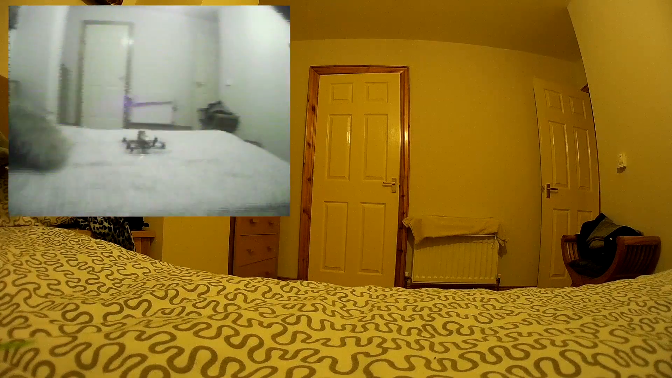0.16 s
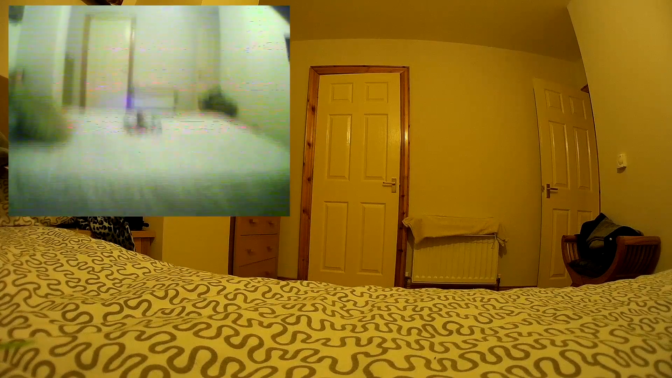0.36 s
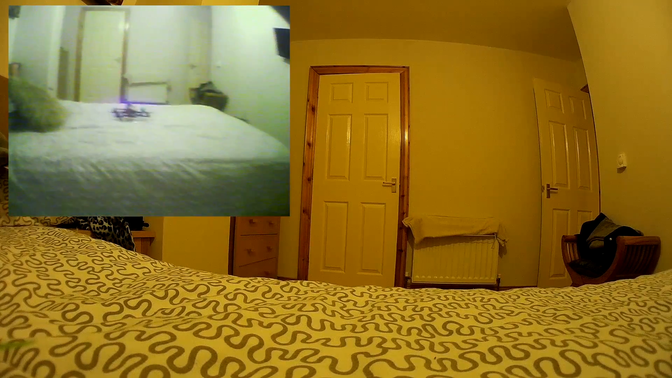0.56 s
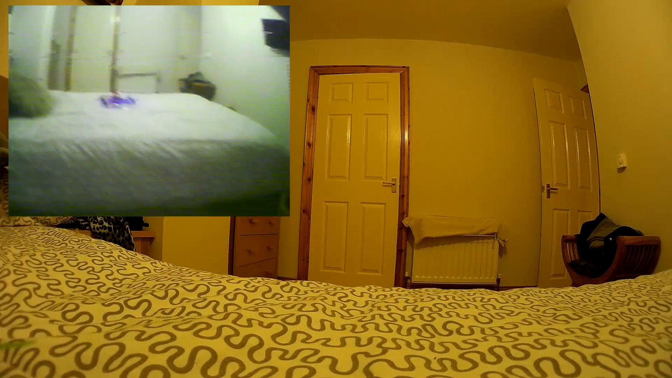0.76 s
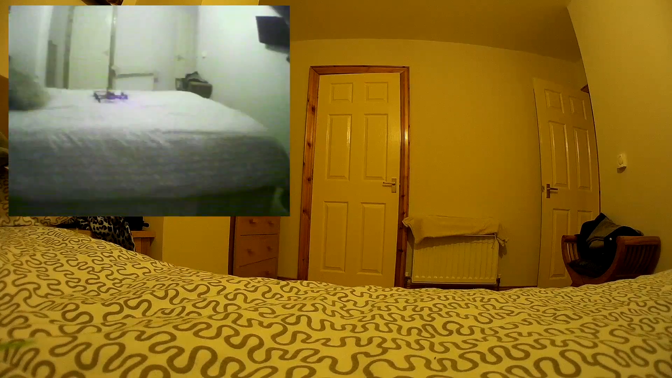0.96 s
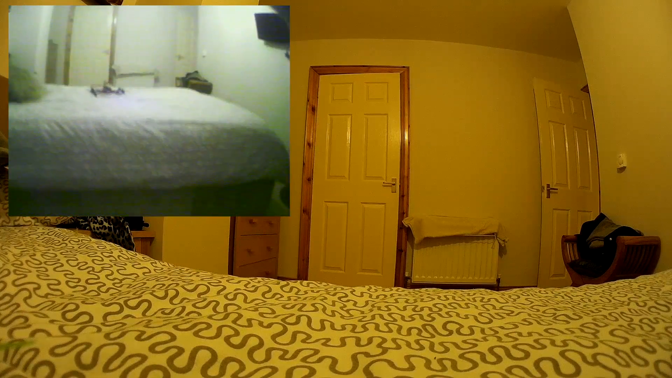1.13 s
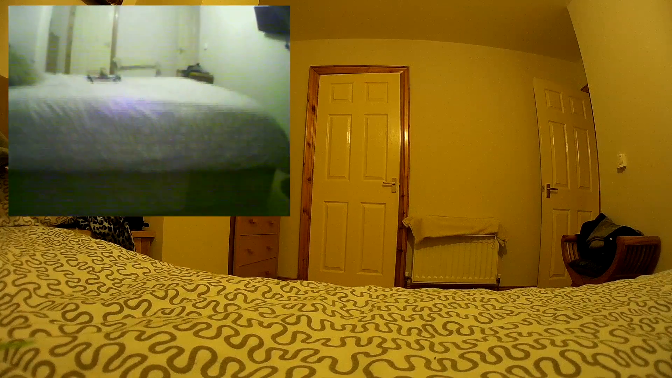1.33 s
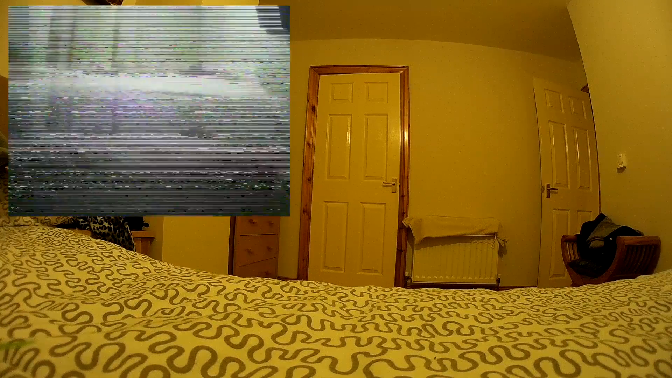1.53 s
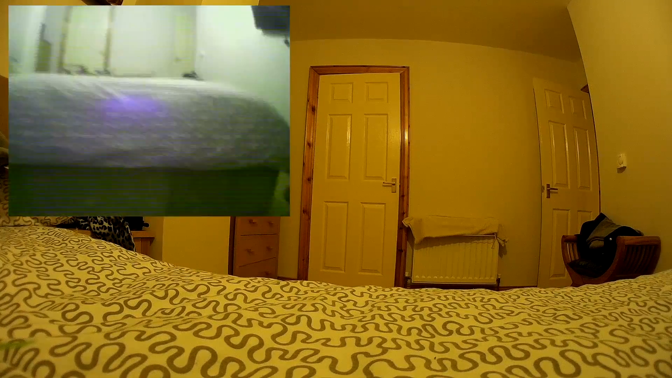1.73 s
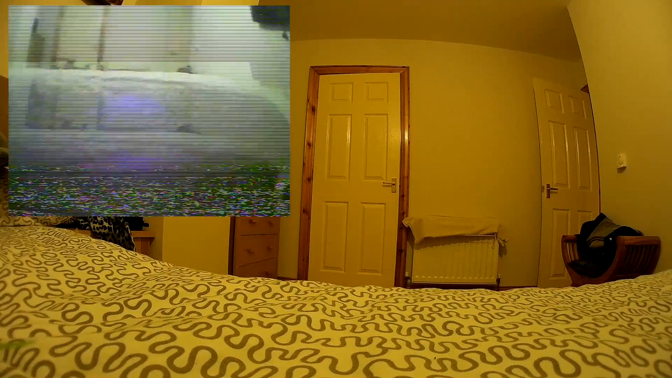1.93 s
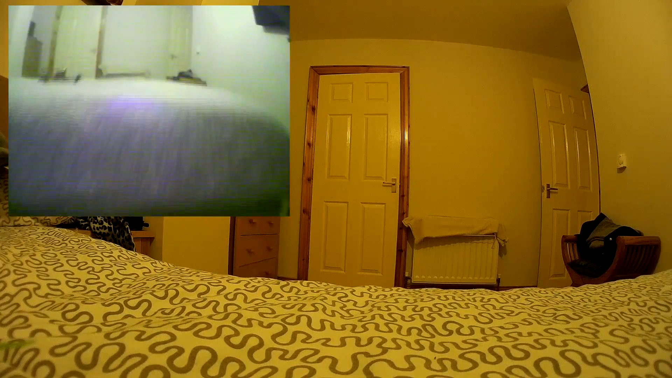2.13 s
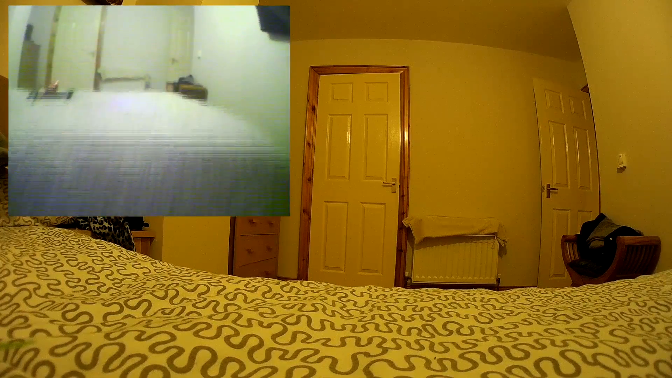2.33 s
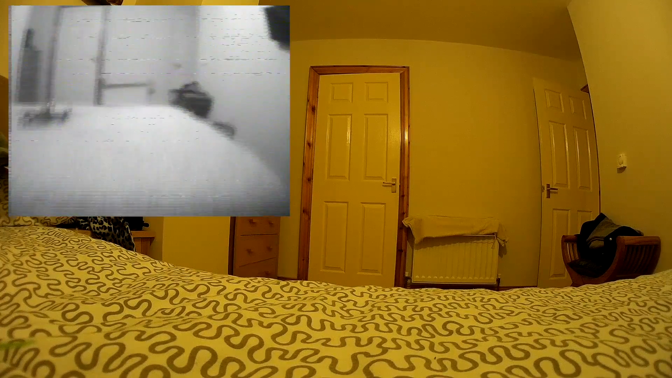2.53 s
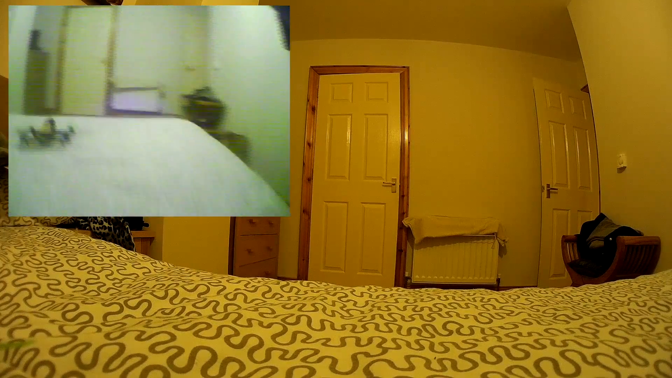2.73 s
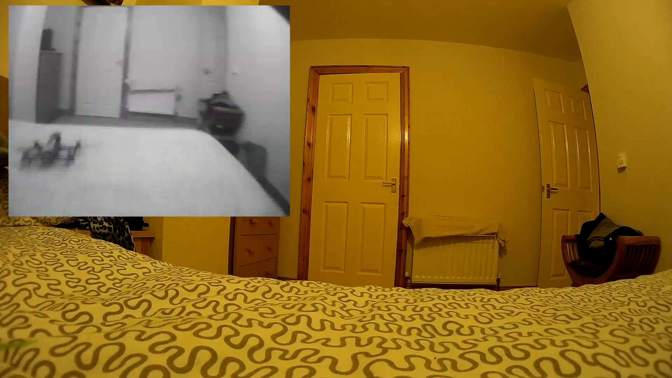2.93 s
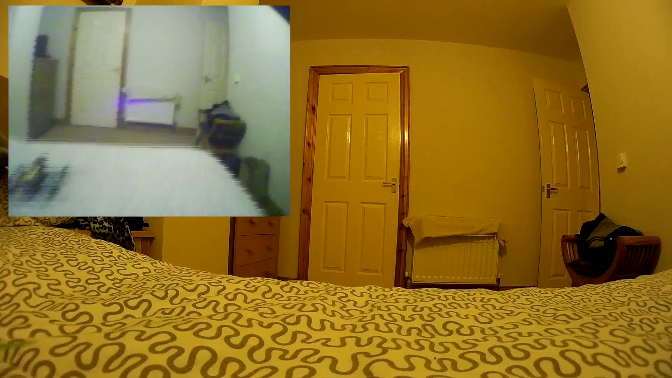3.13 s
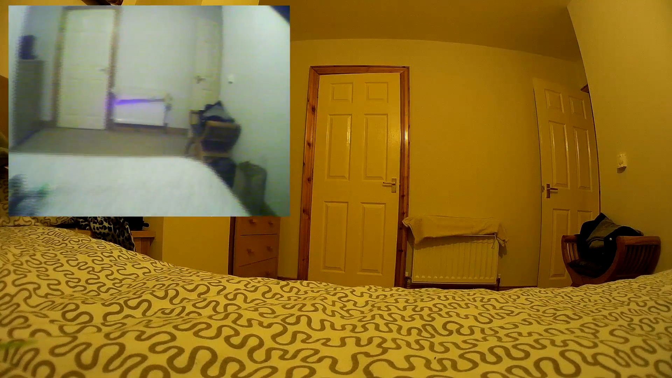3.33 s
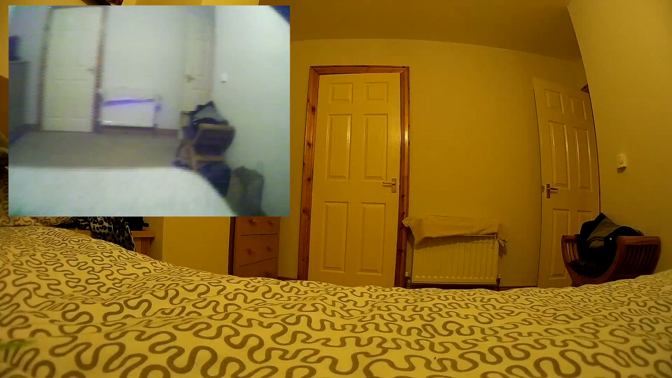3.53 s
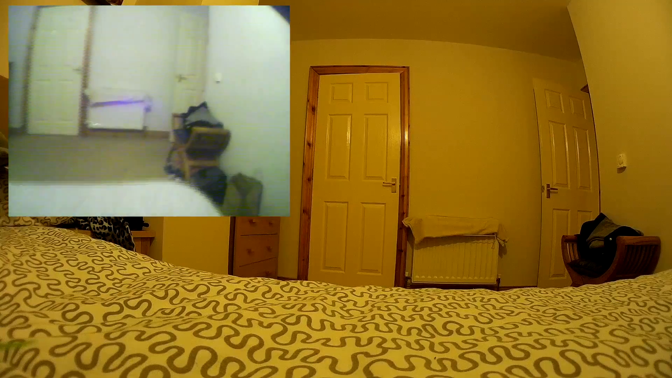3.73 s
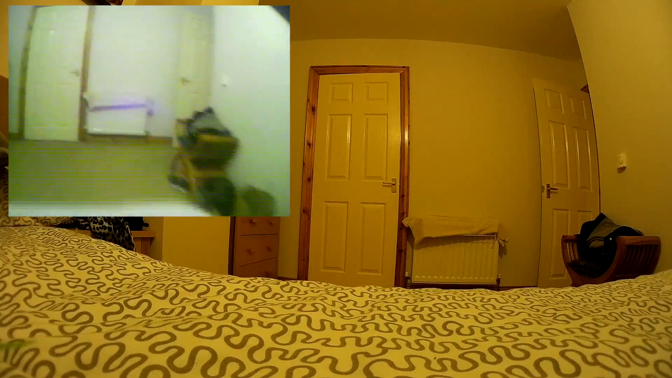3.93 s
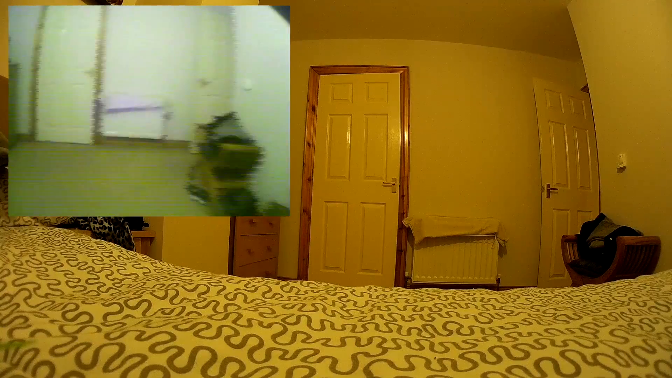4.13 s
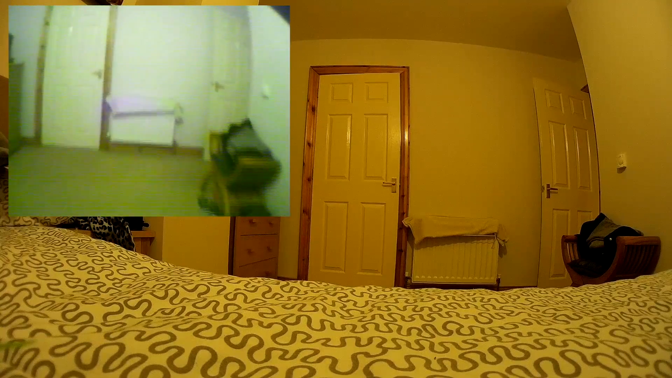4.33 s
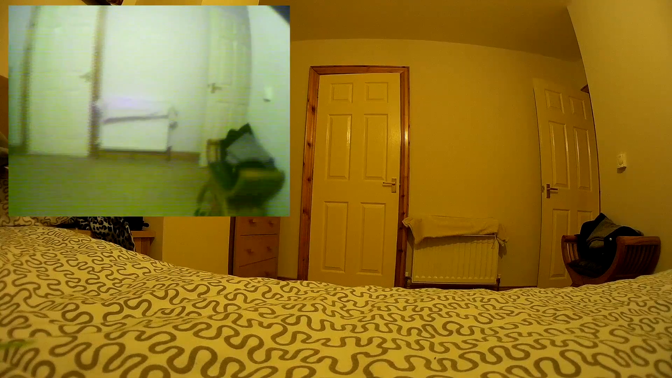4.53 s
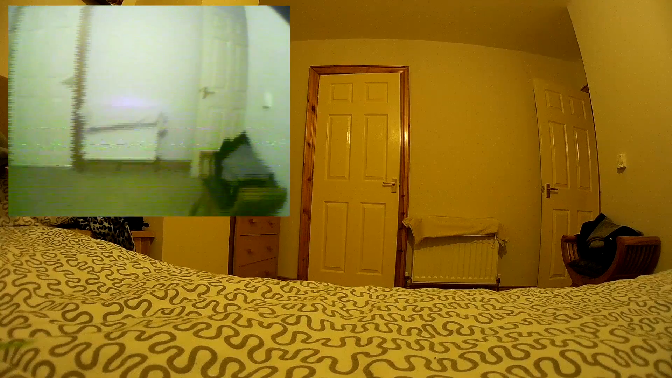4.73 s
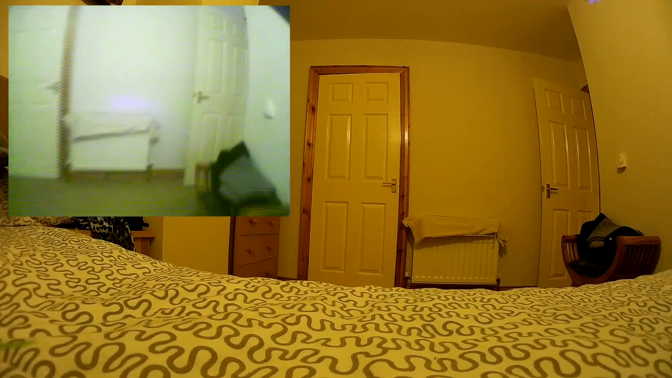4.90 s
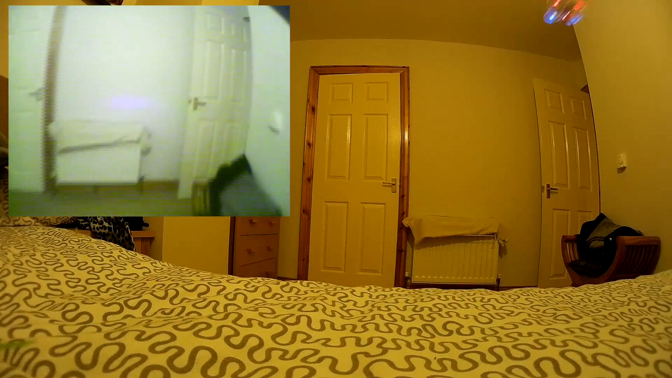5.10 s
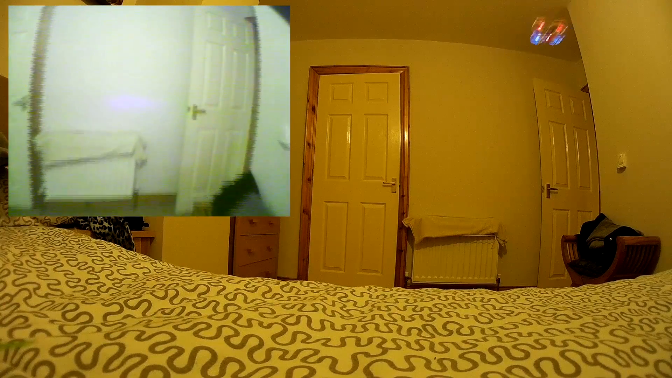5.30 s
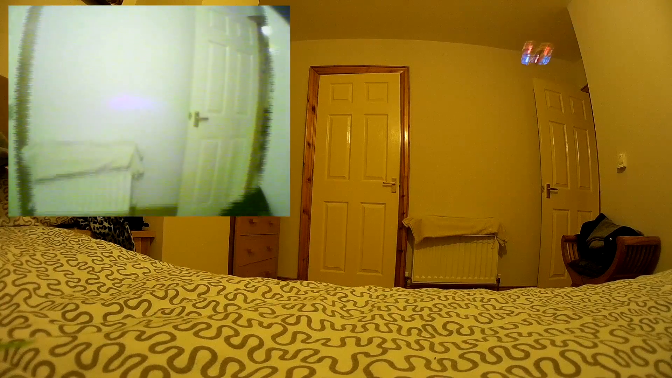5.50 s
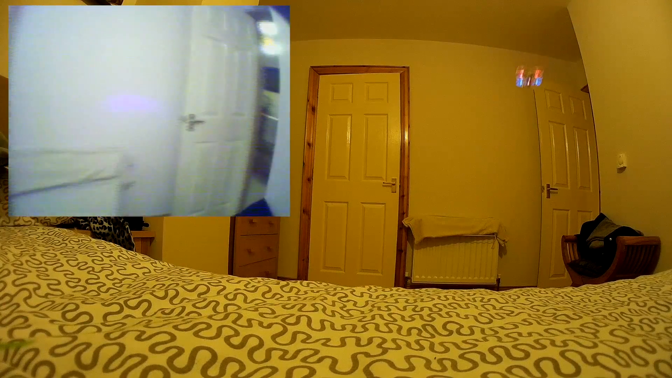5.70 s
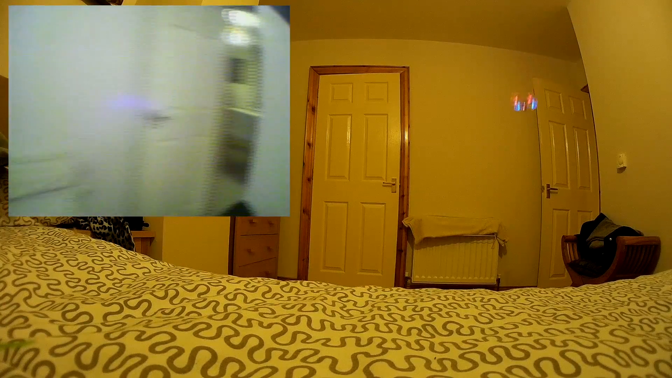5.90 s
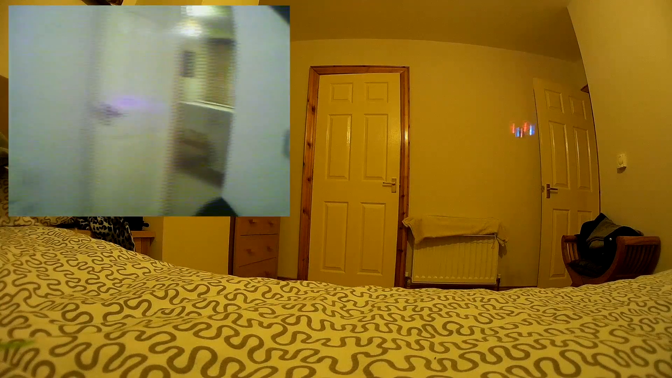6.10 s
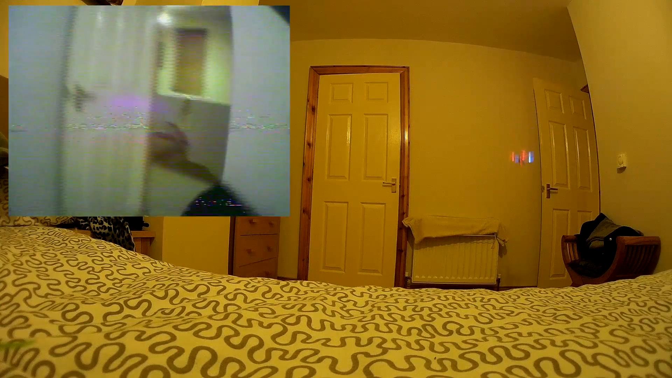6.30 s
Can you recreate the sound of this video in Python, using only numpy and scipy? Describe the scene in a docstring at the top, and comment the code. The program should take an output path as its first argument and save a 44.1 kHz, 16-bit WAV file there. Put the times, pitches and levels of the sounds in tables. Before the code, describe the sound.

A tiny quadcopter is already flying in a quiet bedroom, heard by a fixed microphone on the bed, identical on both channels. From 0 to 3.4 seconds its four propellers give a steady, nasal, mosquito-like whine, dense with harmonics around 700 Hz and up, mixed with bright hiss. The rotors are slightly detuned, so they beat roughly and flutter; pitch rises a little around 1.5 to 2.2 seconds, then settles, with a slight dip in level near 2.7. From 3.5 it swells, loudest at about 4.2 to 4.4 as it passes overhead, harsher and hissier, with a brief soft low thump of buffeting air and a weaker puff at 4.65. By 5 it is receding, slightly lower, with faint low puffs near 5.1 to 5.3. It wavers on quietly to 6.3, a thin high whistle more audible, with short room echo and faint low room tone.

```python
"""A micro quadcopter flies about a bedroom, passes close over a camera on the bed and moves away.
Four two-blade rotors, each a stack of shaft orders plus chopped hiss, beat as the throttle steers them.
Two wavering tones make the motor drive's whistle; faint shaped noise is the still room.
During the pass, bursts of low noise are the downwash buffeting the microphone."""
import sys
import numpy as np
from scipy import signal
from scipy.fft import rfft, irfft, next_fast_len
from scipy.io import wavfile
from scipy.ndimage import uniform_filter1d

SR = 44100
rng = np.random.default_rng(int(sys.argv[2]) if len(sys.argv) > 2 else 0)


def dump(signal):
    """Clip the signal to [-1, 1] and save it as 16-bit WAV at the path in sys.argv[1]."""
    limited = np.clip(np.atleast_2d(signal).T, -1, 1)
    pcm = np.round(limited * 32767).astype(np.int16)
    wavfile.write(sys.argv[1], SR, pcm)


N = 280035


def amp(db):
    """Decibels to gain."""
    return np.exp(np.asarray(db) * np.log(10) / 20)


def unit(x):
    """Scale to rms 1."""
    return x / np.sqrt(np.mean(x ** 2) + 1e-20)


def along(points, position):
    """Read (position, value) points on a log axis of frequency or shaft order."""
    positions, values = np.transpose(points)
    return np.interp(np.log(position + 1e-9), np.log(positions), values)


def curves(rows):
    """One value per sample for each column after the time."""
    times, *columns = np.transpose(rows)
    t = np.arange(N) / SR
    return [np.interp(t, times, column) for column in columns]


def wobble(rate):
    """A random curve of rms 1 with rate knots a second."""
    knots = rng.standard_normal(int(N * rate / SR) + 2)
    knot_position = np.arange(N) * rate / SR
    return unit(np.interp(knot_position, np.arange(len(knots)), knots))


def filtered(x, response):
    """Multiply the spectrum of x by a response of frequency."""
    size = next_fast_len(N + SR // 2)
    hz = np.fft.rfftfreq(size, 1 / SR)
    return irfft(rfft(x, size) * response(hz), size)[..., :N]


def noise(spectrum):
    """Coloured noise of rms 1."""
    return unit(filtered(rng.standard_normal(N), lambda hz: amp(along(spectrum, hz))))


def resonate(x, humps):
    """Colour x with smooth bell-shaped boosts and cuts, as resonances do."""
    def response(hz):
        return amp(sum(db * np.exp(-((hz - centre) / width) ** 2 / 2) for centre, width, db in humps))
    return filtered(x, response)


# throttle, the mean shaft speed of the four rotors: t/s, f/Hz
THROTTLE = [(0, 359), (.2, 371), (.48, 353.6), (.8, 350), (1.05, 358.7), (1.38, 357), (1.52, 375),
            (1.93, 388), (2.2, 386), (2.4, 361.5), (2.65, 363), (2.85, 356.5), (3.05, 360), (3.47, 355.5),
            (3.8, 370.5), (4.35, 367), (5.08, 368), (5.35, 350), (5.7, 350), (5.95, 344), (6.35, 348)]
# steering moves, bell-shaped in time: centre t/s, width/s, pitch f/Hz, roll f/Hz, yaw f/Hz
MOVES = [(0.029, 0.1, 17, 4.5, 3.5), (0.319, 0.066, 4.5, 5.5, 5.5), (0.549, 0.077, 0.5, 1.11, 3.5),
         (.76, 0.056, 1, -3, -1), (1.2, .12, -0.37, 2.5, .5), (1.578, 0.097, 6.5, -2, 1),
         (1.981, .12, 2.5, -2.5, -1), (2.65, 0.086, 4.5, 4.5, -3), (2.9, 0.039, -4, 0, -1.35),
         (3.07, 0.071, 5, 0.78, -3), (3.451, .18, -2, -3, 0.07), (3.96, 0.12, 14, 1.7, -0.77),
         (4.249, .05, -4, -1, 0.14), (4.4, .04, 1, 2, -4), (4.93, .18, 0.9, 2.16, -0.13),
         (5.45, .14, 4.5, -0.93, 1.5), (5.82, 0.051, 21, 0.04, 2.5), (6.28, 0.15, 19.5, 6.5, -8.5)]
# steady offsets that hold the craft level: pitch f/Hz, roll f/Hz, yaw f/Hz
TRIM_HZ = (5.5, 3.5, 0.1)
# share that each rotor takes, one row a rotor: pitch sign, roll sign, yaw sign
MIXER = [(1, 1, 1), (1, -1, -1), (-1, 1, -1), (-1, -1, 1)]


def shaft_speeds():
    """Each rotor follows the throttle; steering speeds up one pair and slows the other."""
    t = np.arange(N) / SR
    throttle, = curves(THROTTLE)
    steering = np.zeros((3, N))
    for centre, width, *axes_hz in MOVES:
        steering += np.outer(axes_hz, np.exp(-((t - centre) / width) ** 2 / 2))
    return throttle + np.array(MIXER) @ (np.array(TRIM_HZ)[:, None] + steering)


# even shaft orders, from the passing blades: order, relative level/dB
BLADES = [(2, -0.5), (4, 2.5), (6, -1.5), (8, -1), (10, -2), (12, -4.5), (14, 0), (16, -4), (18, -7.5),
          (20, -10.5), (22, -5.5), (24, -10), (30, -20)]
# odd shaft orders, from unequal blades: order, relative level/dB
IMBALANCE = [(1, -16.5), (3, -20.5), (5, -14), (7, -52), (11, -11), (13, -45), (17, -22), (29, -17.5)]
# frame modes that flare when a shaft order glides through them: f/Hz, width/Hz, level/dB
FRAME = [(2083, 16, 4), (2950, 12, 1), (3820, 28, 8), (4135, 120, 4.5), (5510, 120, 1), (5740, 68, 4),
         (8220, 150, 3)]
# spectrum of the turbulence at the blades: f/Hz, relative level/dB per Hz
TURBULENCE = [(200, -25), (600, -15.5), (1000, -17), (1600, -7.5), (2500, -7), (3200, -3.5), (5200, 3),
              (7200, -1), (10000, -4.5), (12500, -6.5), (14200, -22.5), (15700, -19)]
FLUTTER, HUNT_HZ = 0.00128, 0.8  # rms speed share shaken by eddies; rms hunting of the stabiliser
FADE_DB, FADE_DB_PER_ORDER, FADE_MAX_DB = 0.96, 0.6, 4.5  # rms fading of an order: base, growth, cap


def rotor(shaft_hz, air_db, chop=0.89):
    """One propeller: shaft orders through the frame, plus turbulence that is chopped by each blade."""
    unsteady_hz = shaft_hz * (1 + FLUTTER * wobble(200)) + HUNT_HZ * wobble(9)
    angle = 2 * np.pi * np.cumsum(unsteady_hz) / SR
    tones = np.zeros(N)
    for order in range(1, 31):
        # higher orders radiate in narrower lobes, so they fade more deeply as the craft moves
        depth_db = min(FADE_DB + FADE_DB_PER_ORDER * order, FADE_MAX_DB)
        level_db = along(IMBALANCE if order % 2 else BLADES, order)
        tone = np.sin(order * angle + rng.uniform(0, 2 * np.pi))
        tones += amp(level_db) * unit(amp(depth_db * wobble(6)) * tone)
    hiss = unit(noise(TURBULENCE) * (1 + chop * np.cos(2 * angle)))  # two blades a turn
    return resonate(tones, FRAME) + amp(air_db) * hiss


# bedroom reverberation, time to fall 60 dB: f/Hz, t60/s
ROOM = [(300, 0.21), (2000, 0.87), (10000, 0.24)]


def bedroom(x, wet_db=-6, count=6):
    """Direct sound plus short decaying-noise tails that trade places as the source moves."""
    hz, t, z = signal.stft(rng.standard_normal((count, SR // 3)), SR, nperseg=256)
    decay = amp(-60 * t / along(ROOM, hz)[:, None])
    tails = signal.istft(z * decay, SR, nperseg=256)[1]
    tails = tails / np.linalg.norm(tails[0])
    echoes = signal.fftconvolve(x[None], tails, axes=1)[:, :N]
    shares = np.array([wobble(5) for _ in range(count)])
    shares = shares / np.linalg.norm(shares, axis=0)
    return x + amp(wet_db) * np.sum(echoes * shares, axis=0)


def lobes(x, depth_db, full_hz=9000):
    """Short waves are beamed in lobes that sweep across the microphone, deepest from full_hz up."""
    hz, t, z = signal.stft(x, SR, nperseg=512)
    field = rng.standard_normal(z.shape)
    for _ in range(2):
        field = uniform_filter1d(field, size=8, axis=0)  # smooth over frequency
        field = uniform_filter1d(field, size=20, axis=1)  # smooth over time
    treble = np.minimum(hz / full_hz, 1)[:, None]
    db = unit(field) * treble * np.interp(t * SR, np.arange(N), depth_db)
    return signal.istft(z * amp(db), nperseg=512)[1][:N]


# where the craft is, seen from the microphone: t/s, approaching/0-1, overhead/0-1, leaving/0-1
POSITION = [(0.9, 0.02, 0, 0.32), (1.9, 0.94, 0.09, 0.05), (3.6, 0.8, 0.03, 0), (3.9, 0.69, 0.05, 0.42),
            (4.2, .05, 0.72, 0.13), (4.45, 0, 0.76, 0.36), (4.65, 0.2, 0.4, 0.4), (4.85, 0, 0.35, 0.96),
            (5.6, 0, 0.15, 1), (6.35, 0.04, 0.06, 0.96)]
# how loud each rotor is against the others: relative level/dB
ROTORS = [0.71, 3.5, 0.17, 1.5]
# fixed resonances that colour the whine: f/Hz, width/Hz, level/dB
RESONANCES = [(2020, 230, 8), (3650, 180, 4), (4200, 200, 5.5), (5900, 600, 4), (8200, 380, 5),
              (10300, 350, 4), (11200, 350, -3)]
# colour of the rotors as the craft approaches: f/Hz, width/Hz, level/dB at full share
APPROACHING = [(720, 120, 0.5), (3030, 237, -1.5), (4400, 330, -5.5), (8200, 230, 3)]
# colour of the rotors heard from below: f/Hz, width/Hz, level/dB at full share
UNDERSIDE = [(710, 210, -2), (1577, 150, 3), (1938, 66, 16.5), (4070, 190, -26), (5190, 460, 11),
             (12500, 1400, -4)]
# colour of the rotors as the craft leaves: f/Hz, width/Hz, level/dB at full share
LEAVING = [(367, 37, 1.5), (1180, 190, -2.5), (3650, 200, 1), (5300, 1700, -1.5), (6457, 610, 10.5),
           (8280, 180, -3.5), (13600, 990, -1.5)]
# share of each register, and its shift with the side that the craft shows:
# lower edge f/Hz, relative level/dB, approaching shift/dB, overhead shift/dB, leaving shift/dB
REGISTERS = [(0, -10.5, 1.5, 0.5, 1), (1616, -2.5, -1.5, -5.5, -.5), (4790, -6, 0.5, 5.5, .5),
             (7240, -12.5, 5.5, -0.5, 1.7), (9050, -14.5, 1.3, 1.8, 1.8)]
# loudness of the rotors, highest in the pass, with brief dips where they beat: t/s, relative level/dB
LOUDNESS = [(0.0, -25), (0.44, -27), (2.09, -27), (2.67, -29), (3.0, -26), (3.55, -25), (3.75, -22.5),
            (4.23, -20), (4.32, -22), (4.37, -20), (4.7, -25), (5.48, -29), (5.52, -28), (6.35, -28.5)]
AIR_DB, AIR_OVERHEAD_DB = 5, 2.5  # turbulence over a blade order of 0 dB; its rise under the propellers
LOBE_DB, LOBE_OVERHEAD_DB = 0.9, 1.4  # rms depth of the treble lobes; its rise under the propellers


def quadcopter(gain_db=0.16):
    """Four rotors in the room; the sound is loudest in the pass and its colour turns as the craft goes by."""
    approaching, overhead, leaving = sides = np.clip(curves(POSITION), 0, 1)
    air_db = AIR_DB + AIR_OVERHEAD_DB * overhead
    rotors = sum(amp(db) * rotor(hz, air_db) for db, hz in zip(ROTORS, shaft_speeds()))
    sound = resonate(bedroom(rotors), RESONANCES)
    for share, colour in ((approaching, APPROACHING), (overhead, UNDERSIDE), (leaving, LEAVING)):
        sound = (1 - share) * sound + share * resonate(sound, colour)
    sound = lobes(sound, depth_db=LOBE_DB + LOBE_OVERHEAD_DB * overhead)
    upper_edges = [row[0] for row in REGISTERS[1:]] + [SR / 2]
    levelled = np.zeros(N)
    for (low, db, *shifts_db), high in zip(REGISTERS, upper_edges):
        band = filtered(sound, lambda hz: (hz >= low) & (hz < high))
        # even out slow swells only: fast beats pass untouched
        slow_rms = np.sqrt(np.abs(uniform_filter1d(band ** 2, size=SR // 5)) + 1e-12)
        levelled += amp(db + np.dot(shifts_db, sides)) * band / slow_rms
    loudness_db, = curves(LOUDNESS)
    return amp(loudness_db + gain_db) * levelled


# switching whistle of the motor drive: f/Hz, level/dB before fading and the rise on leaving
DRIVE = [(7396, -51), (14779, -73)]


def drive(fade_db=3, drift_hz=6, leaving_db=6):
    """The switching whistle wavers in pitch and level, and carries better from a leaving craft."""
    *_, leaving = curves(POSITION)
    whistle = np.zeros(N)
    for hz, db in DRIVE:
        angle = 2 * np.pi * np.cumsum(hz + drift_hz * wobble(25)) / SR
        whistle += amp(db + fade_db * wobble(10)) * unit(np.sin(angle))
    return amp(leaving_db * leaving) * whistle


# spectrum of the still room: f/Hz, relative level/dB per Hz
STILL = [(20, -8), (90, -1.5), (140, -5.5), (220, -3.5), (500, -10), (2000, -44), (15000, -45)]


def still_room(level_db=-62.5):
    """The faint steady noise of the still room, mostly low."""
    return amp(level_db) * noise(STILL)


# gusts of downwash on the microphone: t/s, peak level/dB before lumps and overlap, t60/s
GUSTS = [(4.195, -42, 0.27), (4.29, -34, 0.22), (4.345, -38, 0.21), (4.39, -34.5, 0.22), (4.45, -45, 0.55),
         (4.655, -44, 0.34), (5.085, -54.5, 0.29), (5.2, -58, 0.42), (5.295, -57, 0.31)]
# spectrum of air on the microphone port: f/Hz, relative level/dB per Hz
BUFFET = [(20, -6), (50, -3), (100, -6), (220, -2), (400, -8), (700, -10), (1500, -43)]
GUST_RISE_S = 0.15  # time that a gust takes to climb 60 dB


def downwash(lump_db=2, corner_hz=170):
    """Gusts of air hit the port, rise fast and die away; a stronger flow is also brighter."""
    t = np.arange(N) / SR
    gusts = np.zeros(N)
    for peak_s, db, t60 in GUSTS:
        drop = np.maximum((peak_s - t) / GUST_RISE_S, (t - peak_s) / t60)
        gusts += amp(db - 60 * drop)
    air = noise(BUFFET)
    dull = unit(filtered(air, lambda hz: 1 / (1 + (hz / corner_hz) ** 2)))
    flow = gusts / gusts.max()
    return gusts * amp(lump_db * wobble(40)) * (flow * air + (1 - flow) * dull)


def scene():
    """Everything reaches one microphone, the same on both channels."""
    mono = quadcopter() + drive() + still_room() + downwash()
    return np.array([mono, mono])


TOP_HZ = 15720  # band limit of the camera


def record(dry):
    """The camera keeps nothing above its band limit."""
    return filtered(dry, lambda hz: hz < TOP_HZ)


dry = scene()
out = record(dry)
dump(out)
```